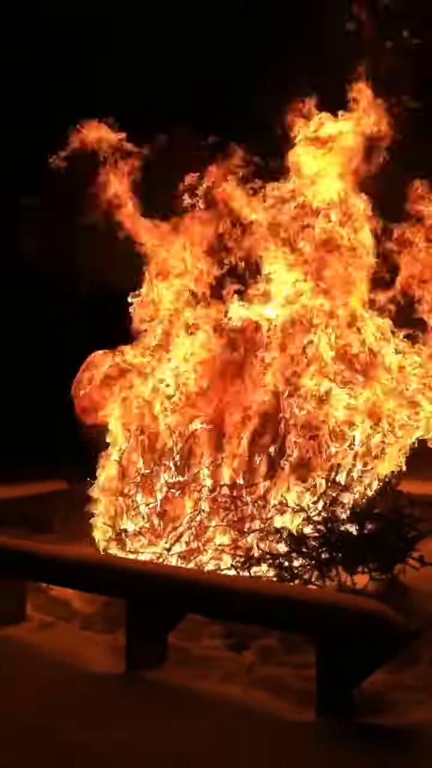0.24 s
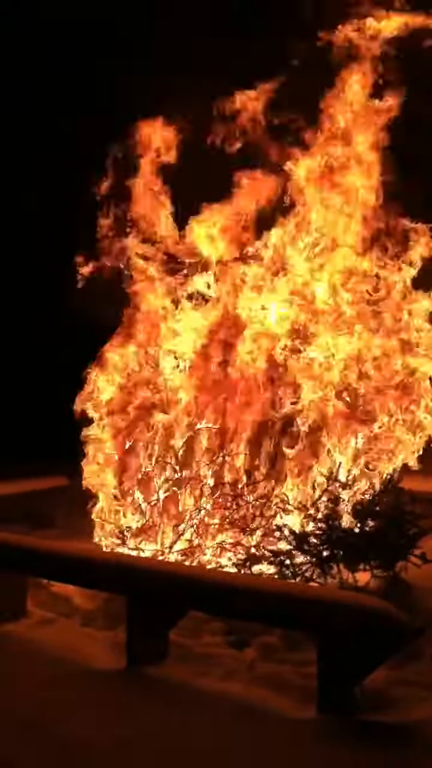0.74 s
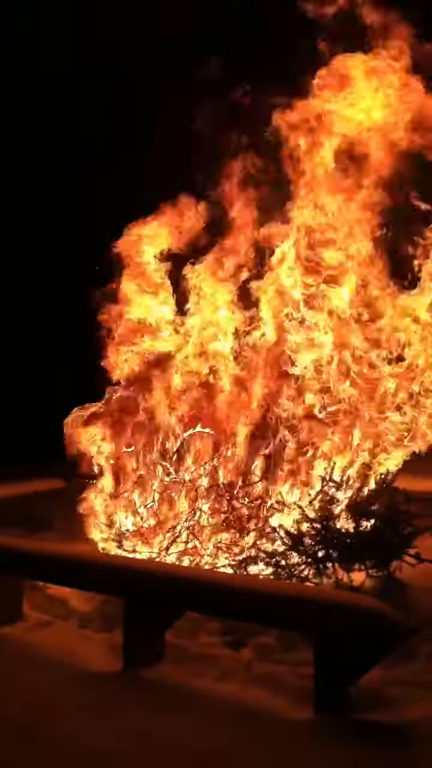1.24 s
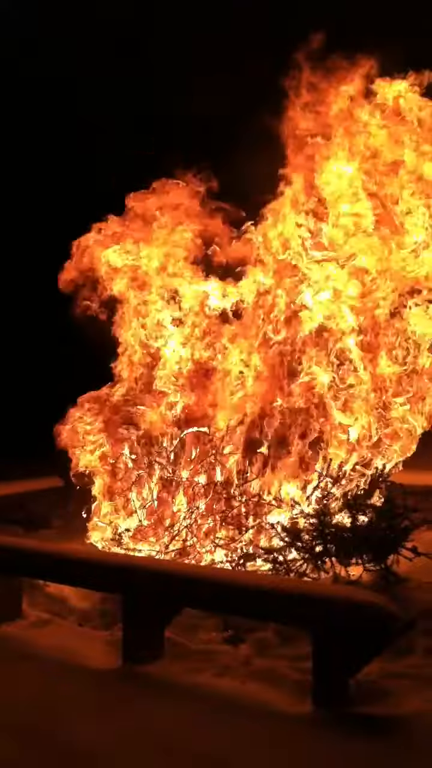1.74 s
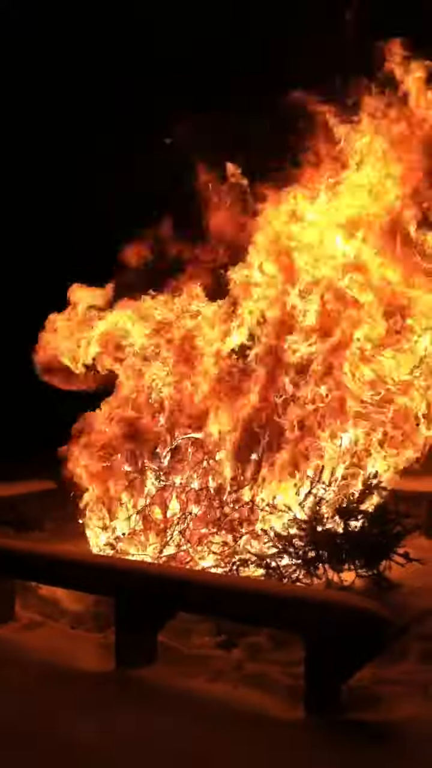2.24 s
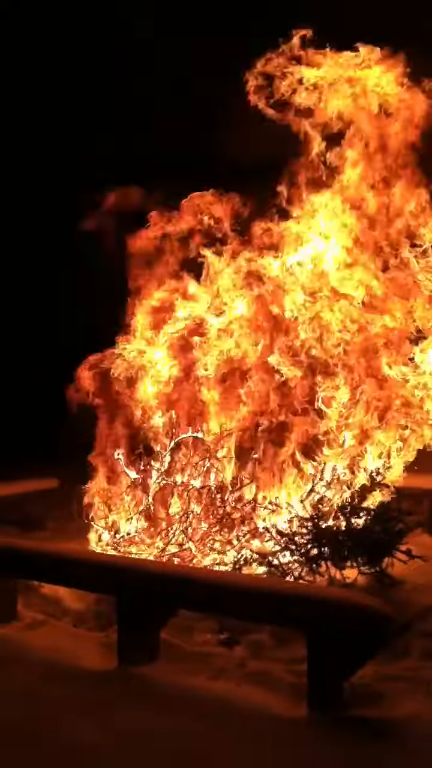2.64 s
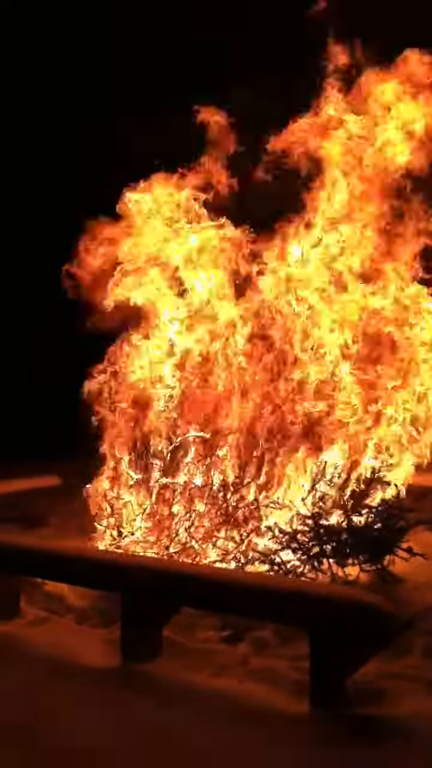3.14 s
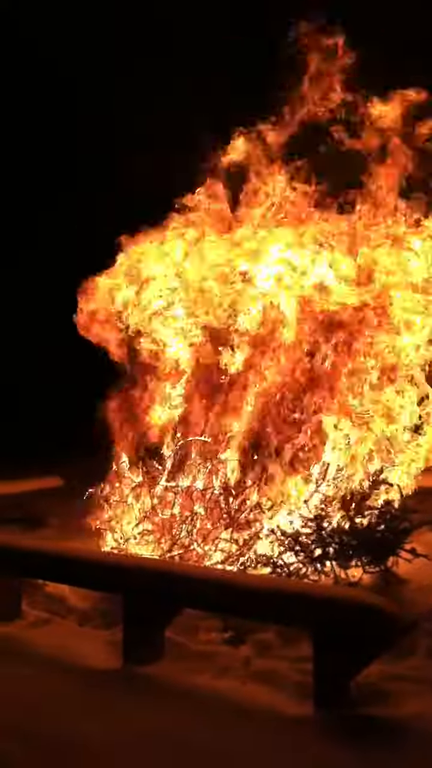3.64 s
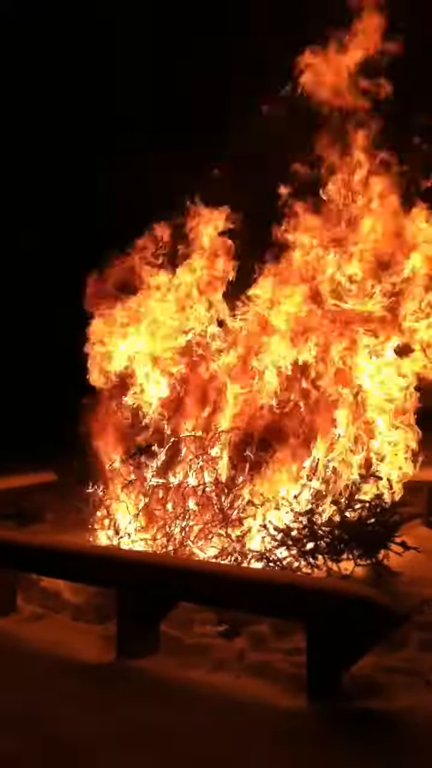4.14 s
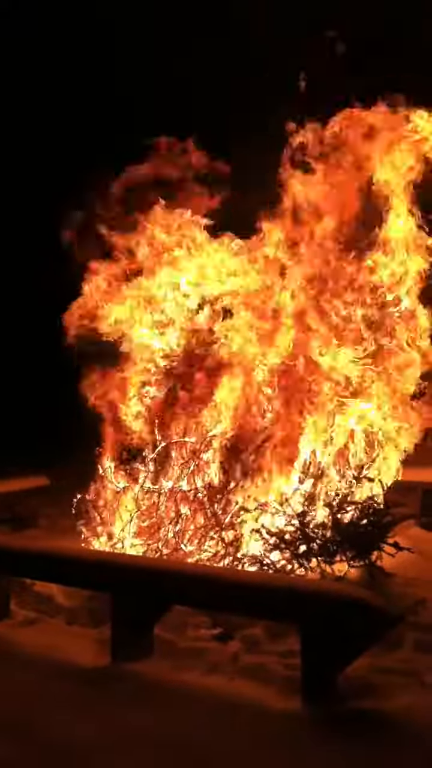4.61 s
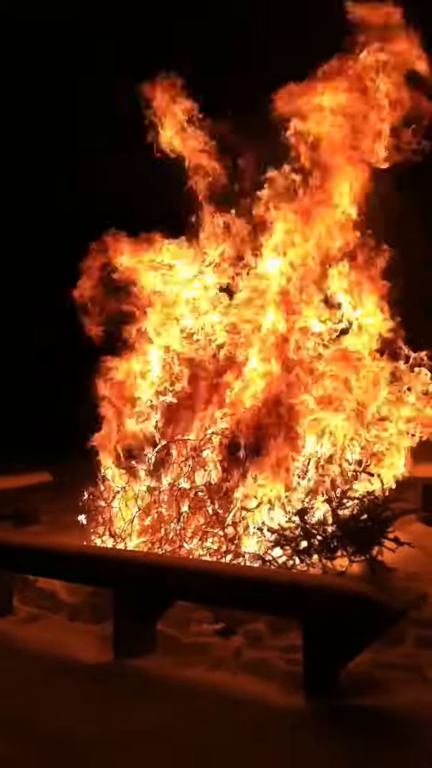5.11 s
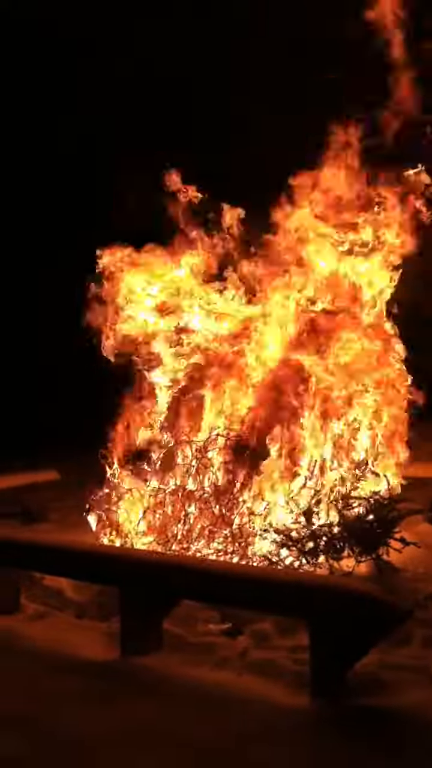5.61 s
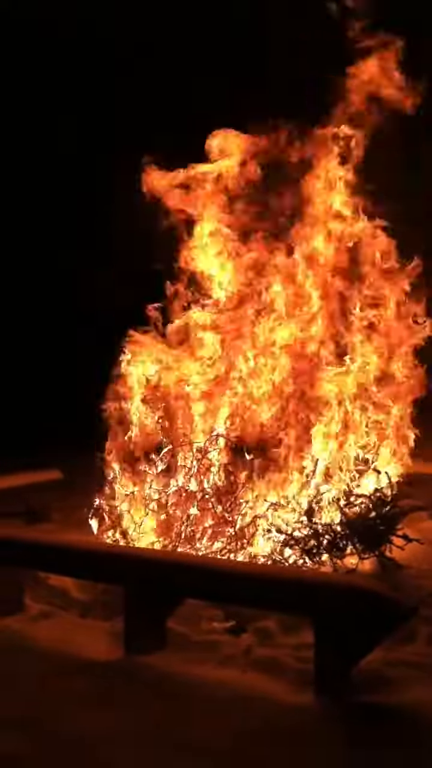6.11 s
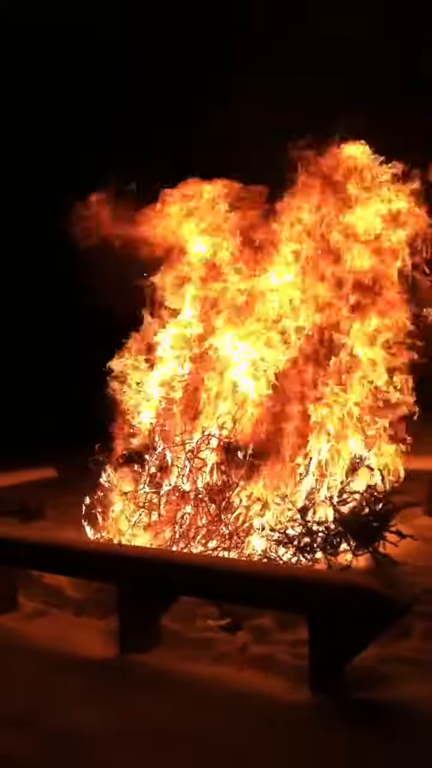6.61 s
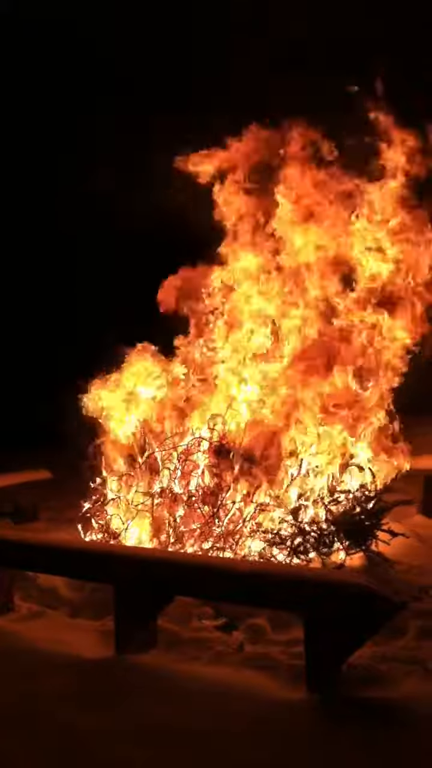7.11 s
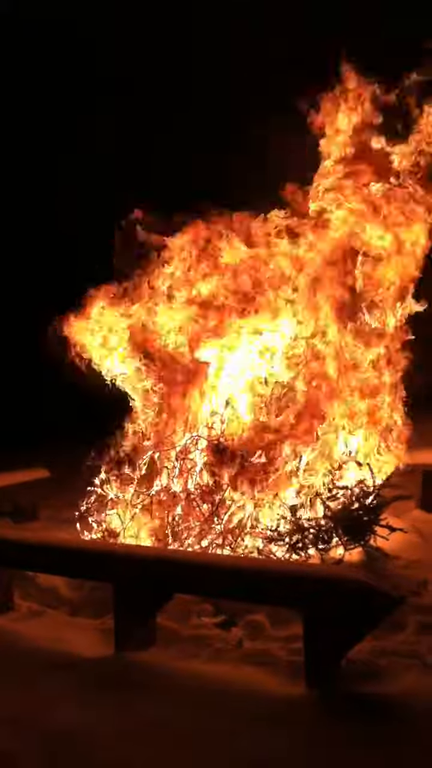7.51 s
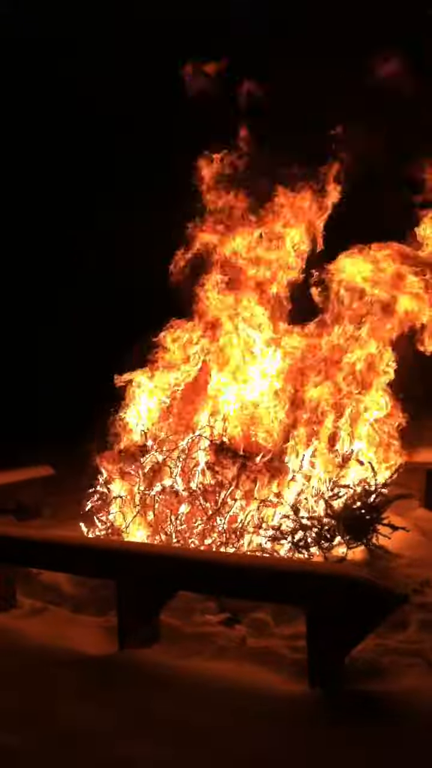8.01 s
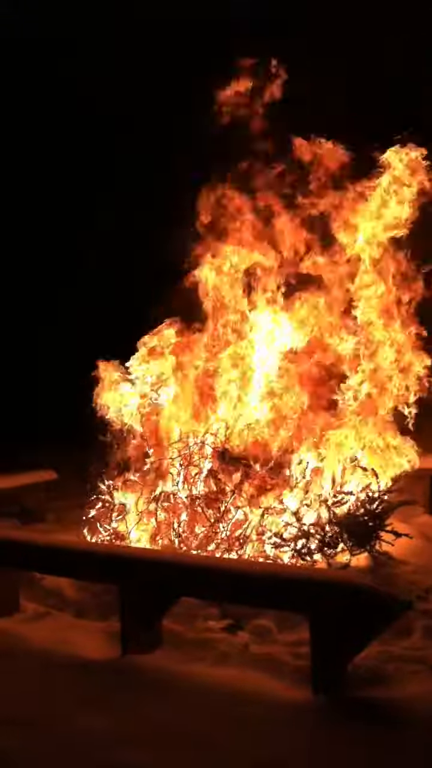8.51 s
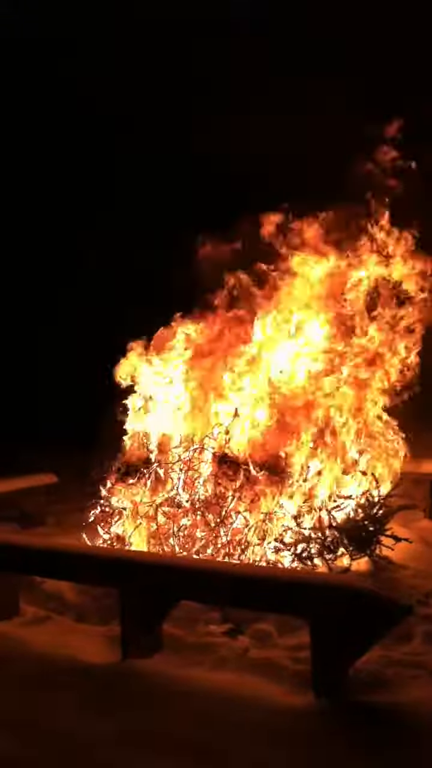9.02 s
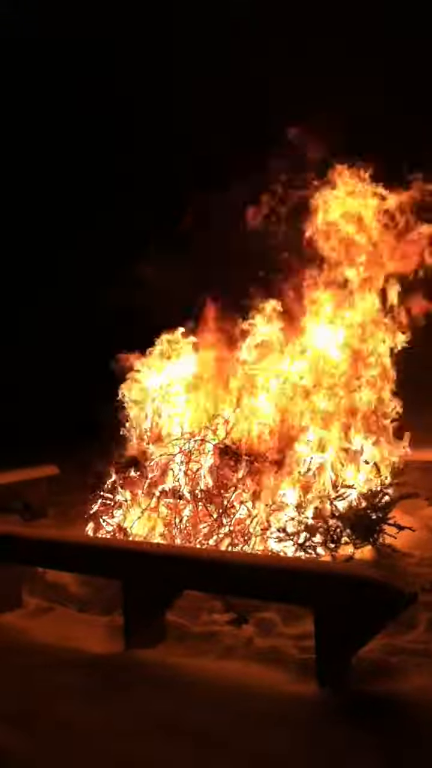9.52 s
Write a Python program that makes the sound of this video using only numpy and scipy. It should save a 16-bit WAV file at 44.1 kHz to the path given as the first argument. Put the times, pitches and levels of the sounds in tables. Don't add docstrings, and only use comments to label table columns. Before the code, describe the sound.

Close bonfire at night: steady soft roar, thousands of tiny needle bursts, bright ticks and woody cracks, slowly thinning toward the end.

```python
import sys
import numpy as np
from scipy import signal
from scipy.fft import rfft, irfft, next_fast_len
from scipy.io import wavfile
from scipy.ndimage import minimum_filter1d, map_coordinates

SR = 44100
rng = np.random.default_rng(int(sys.argv[2]) if len(sys.argv) > 2 else 0)


def amplitude_ratio(level_db):
    exponent = np.asarray(level_db, float) / 20
    return 10 ** exponent


def waveform_to_disk(signal):
    frames = np.transpose(np.atleast_2d(signal))
    scaled = np.clip(frames, -1, 1) * 32767
    samples = np.round(scaled).astype(np.int16)
    wavfile.write(sys.argv[1], SR, samples)


N = 429975
TIME_S = np.arange(N) / SR
LEAD_S = 0.004

# time_s, crackle_db
BLAZE = [(0.0, -42), (1.41, -41.5), (1.76, -42.5), (2.15, -42), (2.47, -42.5), (2.8, -42), (3.75, -44),
         (5.02, -43), (5.21, -44.5), (6.03, -43.5), (7.17, -46.5), (7.3, -45), (8.12, -47), (8.28, -47),
         (8.63, -46), (9.31, -47.5), (9.75, -46.5)]


def unit(x):
    return x / np.sqrt(np.mean(x ** 2) + 1e-20)


def along(points, hz):
    f, v = np.transpose(points)
    return np.interp(np.log(hz + 1), np.log(f + 1), v)


def blaze_db(s):
    return np.interp(s, *np.transpose(BLAZE))


def wobble(rate_hz):
    knots = rng.standard_normal(int(N * rate_hz / SR) + 4)
    return map_coordinates(knots, [np.arange(N) * rate_hz / SR])


def coloured(x, db_at):
    m = 2 * next_fast_len(N // 2 + 4096)
    gain_db = np.maximum(db_at(np.fft.rfftfreq(m, 1 / SR)), -120)
    cepstrum = irfft(np.log(amplitude_ratio(gain_db)), m)
    cepstrum *= np.r_[1, 2 * np.ones(m // 2 - 1), 1, np.zeros(m // 2 - 1)]
    return irfft(rfft(x, m) * np.exp(rfft(cepstrum)), m)[:N]


def laid(at, rows):
    return np.bincount(at.ravel(), rows.ravel(), N + SR)[:N]


def placed(s, rows):
    return laid(np.round((s - LEAD_S) * SR).astype(int) + np.arange(rows.shape[1]), rows)


def splinters(split_ms, count=9, size=512):
    # freq_hz, gain_db
    air_loss = [(8500, 2.5), (10000, -4.5), (13000, -11.5), (15500, -17), (16600, -30)]
    draw = rng.random((len(split_ms), 3, count))
    place = (draw[:, 0] - 0.38) * (np.arange(count) > 0)
    lag_s = np.clip(split_ms, 0.1, 3)[:, None] * 4.55 * place / 1000
    loss_db = 5.0 + 6.4 * draw[:, 1] + 6.9 * np.abs(place) + 4.0 * (place < 0)
    strength = amplitude_ratio(-loss_db) * np.where(draw[:, 2] > 0.35, 1, -1)
    strength[:, 0] = -1
    hz = np.fft.rfftfreq(size * 2, 1 / SR)
    delays = np.exp(-2j * np.pi * hz * (LEAD_S + lag_s[:, :, None]))
    direct = np.sum(strength[:, :, None] * delays, 1)
    bounce_s = 0.006 + 0.0052 * draw[:, 1, :1]
    bounce = amplitude_ratio(-19) * np.exp(-2j * np.pi * hz * bounce_s)
    turn = np.exp(1j)
    return hz, direct * (1 + bounce) * amplitude_ratio(along(air_loss, hz)) * turn


def rung(hz, spectra, centre_hz, octaves):
    hump = np.exp(-(np.log2((hz + 1) / centre_hz) / octaves) ** 2)
    rows = irfft(spectra * hump)
    return rows / np.linalg.norm(rows, axis=1, keepdims=True)


def roar():
    # freq_hz, density_db_per_hz
    roar_spectrum = [(13, -66), (22, -47), (48, -25), (135, -2), (182, 0.5), (380, -4), (620, -12.5),
                     (847, -10.5), (1100, -11.5), (1430, -29), (2420, -120)]
    level_db, follows = -47.5, 0.44
    rumble = unit(coloured(rng.standard_normal(N), lambda hz: along(roar_spectrum, hz)))
    fire_db = blaze_db(TIME_S)
    swing_db = follows * (fire_db - fire_db.mean())
    flutter_db = 0.6 * wobble(7) + 0.8 * wobble(18)
    return amplitude_ratio(level_db + swing_db + flutter_db) * rumble


def kicks(s, db, hz, turns, size=48):
    phase = np.arange(size) / SR * np.clip(hz, 300, SR / 3)[:, None]
    kick = -amplitude_ratio(db)[:, None] * np.sin(2 * np.pi * phase) * np.exp(-phase / turns)
    return laid(np.round(s * SR).astype(int)[:, None] + np.arange(size), kick)


def needles(count=9000):
    # freq_hz, density_db_per_hz
    needle_spectrum = [(300, -17), (800, -7.5), (2000, 0.5), (4000, -3.5), (8300, -0.5), (10000, -6.5),
                       (13000, -11), (15700, -17.5), (15900, -35)]
    uneven_grows = 0.45
    hiss_follows = 0.37
    draw = rng.random((count, 4))
    clumps = np.cumsum(amplitude_ratio(4.5 * wobble(60) + 1.5 * wobble(14)))
    s = np.interp(draw[:, 0], clumps / clumps[-1], TIME_S)
    uneven = 1 + uneven_grows * (s * SR / N - 0.5)
    size_db = -3.5 * uneven * (np.log(draw[:, 1] + 0.013) + 1.3)
    pitch_hz = 6500 * amplitude_ratio(9.5 * (draw[:, 2] - draw[:, 3]))

    def tint_db(hz):
        return along(needle_spectrum, hz)

    def lift_db(hz):
        return 5.53 * np.log2(np.maximum(hz, 4000) / 4000)

    grains = kicks(s, size_db, pitch_hz, turns=0.3)
    grains = unit(coloured(grains, lambda hz: tint_db(hz) + lift_db(hz)))
    steam = amplitude_ratio(0.87 * wobble(50)) * rng.standard_normal(N)
    hiss = unit(coloured(steam, lambda hz: tint_db(hz) - 0.3 * lift_db(hz)))
    fire_db = blaze_db(TIME_S)
    hiss_db = -2.5 + hiss_follows * (fire_db - fire_db.mean())
    return amplitude_ratio(fire_db) * (amplitude_ratio(-2.5) * grains + amplitude_ratio(hiss_db) * hiss)


def ticks(count=145):
    # start_s, level_db
    near_needles = [(0.3563, -9), (0.3833, -10), (0.7032, -7), (0.7791, -9.5), (1.1415, -8), (1.2157, -8),
                    (1.2753, -9), (1.294, -9), (1.466, -6), (1.4983, -8), (1.517, -7), (1.586, -7.5),
                    (1.668, -9.5), (1.78, -8.5), (2.1168, -9), (2.3215, -6), (3.218, -10), (3.8996, -11),
                    (4.0636, -9.5), (4.3902, -13), (4.9894, -11), (5.4717, -9.5), (5.7017, -10.5),
                    (5.7456, -10), (5.9354, -10), (6.078, -11), (6.3286, -13), (7.1046, -13), (8.086, -12),
                    (8.6108, -11.5)]
    over_crackle_db, spread_db = 29.5, 2.5
    centre_hz, scatter_db = 6400, 1.8
    crowd = 0.85
    draw = rng.random((count, 2))
    chance_s = LEAD_S + (N / SR - LEAD_S) * draw[:, 0] ** crowd
    chance_db = blaze_db(chance_s) + over_crackle_db + spread_db * (draw[:, 1] - 0.5)
    s, db = np.c_[np.transpose(near_needles), [chance_s, chance_db]][:, :, None]
    pitch_hz = centre_hz * amplitude_ratio(scatter_db * rng.standard_normal(s.shape))
    hz, blows = splinters(np.full(len(s), 0.5), count=6)
    return placed(s, amplitude_ratio(db - 4.5) * rung(hz, blows, 1.15 * pitch_hz, octaves=1.67))


def twigs():
    # start_s, crack_db, crack_pitch_hz, thud_over_crack_db
    thick_twigs = [(0.639, -6, 6100, -8), (0.8005, -3, 7300, -9), (1.1038, -7, 7000, -8),
                   (1.198, 6.5, 7000, -6.5), (1.8942, -10, 5700, -20), (2.1037, -4.5, 6100, -12),
                   (2.141, -5, 7200, -10), (2.626, -1, 8500, -9), (2.7372, -4.5, 7100, -15),
                   (3.0234, -1.5, 7450, -8), (3.1988, -4.5, 6400, -12), (3.5624, -2.5, 6000, -6),
                   (3.7103, -6, 6500, -8), (3.8789, -7, 5700, -5), (3.9355, -4, 7600, -11),
                   (3.9927, -13, 2200, 0), (5.0266, -8, 5600, 1), (5.2237, -9, 5000, 0.5),
                   (6.0263, -0.7, 4670, 8), (6.253, -7, 6350, 2.5), (7.2658, -2, 5800, -9),
                   (7.461, -7.5, 6100, -3), (7.7324, -11.5, 5400, 8), (7.8476, -5, 11500, -15),
                   (7.9854, -12.5, 6600, 7), (8.1406, 0, 4770, -9), (8.3698, -14.5, 5100, 4.5),
                   (8.7698, -10.5, 5330, 3), (9.4564, -5, 6800, -6.5), (9.5512, -15, 5000, 5)]
    # start_s, crack_db, crack_pitch_hz
    thin_twigs = [(0.838, -10, 7100), (1.799, -10, 3000), (1.9214, -8, 6400), (2.4594, -11.5, 7100),
                  (3.452, -8, 6700), (3.6754, -9, 6800), (4.3567, -12, 6400), (4.8758, -9.5, 7400),
                  (6.384, -8, 5700), (7.2212, -10, 5800), (7.61, -12.5, 6100), (7.6508, -10, 7300),
                  (7.867, -8, 6400), (7.9783, -12, 6200), (8.1495, -12.3, 6200), (8.175, -9.5, 6200),
                  (8.2432, -12, 4800), (8.2683, -7.5, 4900), (8.2735, -11, 6200), (8.4012, -8, 5770),
                  (8.594, -11, 6500), (9.031, -15, 5900), (9.0527, -8.5, 7240), (9.1253, -10, 3470),
                  (9.1513, -10, 6700), (9.244, -13.5, 6900), (9.2857, -10.5, 7100), (9.302, -10, 5800),
                  (9.555, -9.5, 6500), (9.679, -8.5, 7000)]
    thin_thud_db = -6
    split_ms, split_scatter_db, split_shortens = 0.453, 2, 0.195
    fizz_0_db, fizz_grows, fizz_scatter_db = -16.5, 0.32, 3.5
    thud_sinks, thud_widens = 0.024, 0.1
    rows = list(thick_twigs) + [(*row, thin_thud_db) for row in thin_twigs]
    s, db, pitch_hz, thud_db = np.transpose(rows)[:, :, None]
    luck = rng.standard_normal((len(s), 2))
    fizz_db = fizz_0_db - (1 - fizz_grows) * db + fizz_scatter_db * luck[:, :1]
    split_db = split_scatter_db * luck[:, 1] - split_shortens * db[:, 0]
    hz, blows = splinters(split_ms * amplitude_ratio(split_db))
    crack = rung(hz, blows, 1.05 * pitch_hz, octaves=1.1)
    thud_hz = 2350 * amplitude_ratio(-thud_sinks * thud_db)
    thud = amplitude_ratio(thud_db - 0.5) * rung(hz, blows, thud_hz, octaves=0.87 * amplitude_ratio(thud_widens * thud_db))
    fizz = amplitude_ratio(fizz_db - 3.5) * rung(hz, blows, centre_hz=13700, octaves=0.56)
    return placed(s, amplitude_ratio(db - 6.5) * (crack + thud + fizz))


def spits():
    # start_s, level_db, pitch_hz
    resin_beads = [(7.1339, -15, 8000), (7.4113, -12, 6400), (7.8107, -17, 9000), (7.8197, -13, 9000),
                   (8.1073, -12, 8000), (8.1835, -17, 5400), (8.4832, -11.5, 10000), (8.7273, -11, 9500),
                   (8.7761, -14, 6400), (8.7855, -11.5, 9500), (8.935, -13, 8000), (9.0034, -14, 8400),
                   (9.0364, -14, 7500), (9.062, -10.5, 8500), (9.1188, -15, 5300), (9.1696, -17, 4900),
                   (9.1983, -14, 6500), (9.3642, -19, 9000), (9.4662, -15, 7100), (9.6201, -12.5, 6500),
                   (9.6335, -11, 6300), (9.6959, -16, 6700)]
    s, db, pitch_hz = np.transpose(resin_beads)[:, :, None]
    hz, blows = splinters(np.full(len(s), 0.4), count=5)
    return placed(s, amplitude_ratio(db - 5.0) * rung(hz, blows, 1.2 * pitch_hz, octaves=1.4))


def pit(x, stretch=4000):
    # freq_hz, t60_s
    pit_decay = [(500, 0.035), (4000, 0.0096), (12000, 0.02)]
    out = np.zeros(N + SR)
    for start in range(0, N, stretch):
        hz, t, z = signal.stft(rng.standard_normal(4096), SR, nperseg=128)
        decay = amplitude_ratio(-60 * t / along(pit_decay, hz)[:, None])
        tail = signal.istft(z * decay, SR, nperseg=128)[1]
        echo = signal.fftconvolve(x[start:start + stretch], tail / np.linalg.norm(tail))
        first = start + 40
        out[first:first + len(echo)] += echo
    return out[:N]


def scene():
    crackle = needles()
    pops = ticks() + twigs() + spits()
    echoes = pit(amplitude_ratio(-12) * pops + amplitude_ratio(-12.5) * crackle)
    return (roar() + crackle + pops + echoes)[None]


def body(x):
    # centre_hz, width_hz, gain_db
    resonances = [(590, 430, 0.5), (840, 280, 2.5), (1130, 240, -4), (2015, 440, -9.5), (2560, 160, 1.5),
                  (3010, 310, -8), (4733, 175, 5.5), (5215, 300, -4.5), (6680, 260, -2), (9000, 280, 2)]

    def ripple_db(hz):
        return sum(db / (1 + (2 * (hz - centre) / width) ** 2) for centre, width, db in resonances)

    return coloured(x, ripple_db)


def starved(x, size=12):
    # freq_hz, level_db
    faint = [(5000, -99), (9000, -88), (13000, -87), (15650, -92), (15800, -87), (16500, -93)]
    top_hz = 16600
    hz, _, z = signal.stft(x, SR, nperseg=2048)
    band = np.arange(len(hz)) // size
    power = np.add.reduceat(np.abs(z) ** 2, np.arange(0, len(hz), size)) / size
    level_db = 10 * np.log10(power + 1e-20) + 3 * rng.standard_normal(power.shape)
    floor_db = np.where(hz > faint[0][0], along(faint, hz), -200)
    margin_db = level_db[band] - floor_db[:, None]
    kept = (hz < top_hz)[:, None] / (1 + amplitude_ratio(np.clip(-8 * margin_db, -99, 60)))
    return signal.istft(z * kept, SR, nperseg=2048)[1][:N]


def shadowed(x, size=6, order=9):
    # freq_hz, excess_db
    shadow = [(3000, 26), (6000, 25.5), (10000, 18.5), (13000, 14.5), (16000, 7)]
    hz, _, z = signal.stft(x, SR, nperseg=256)
    treble = hz > shadow[0][0]
    frame_db = 10 * np.log10(np.sum(np.abs(z[treble]) ** 2, 0) + 1e-20)
    shadow_db = -minimum_filter1d(-frame_db, order) - frame_db
    luck_db = 3.8 * rng.standard_normal((len(hz) // size + 1, z.shape[1] // 2 + 1))
    luck_db = luck_db[np.arange(len(hz)) // size][:, np.arange(z.shape[1]) // 2]
    needed_db = np.where(treble, along(shadow, hz), 200)
    excess_db = shadow_db + luck_db - needed_db[:, None]
    return signal.istft(z / (1 + amplitude_ratio(np.clip(6 * excess_db, -99, 30))), SR, nperseg=256)[1][:N]


def band_limit(x):
    return signal.sosfilt(signal.butter(12, 16510, fs=SR, output="sos"), x)


def record(dry):
    mix = shadowed(starved(body(dry[0])))[None]
    return band_limit(mix)


dry = scene()
out = record(dry)
waveform_to_disk(out)
```